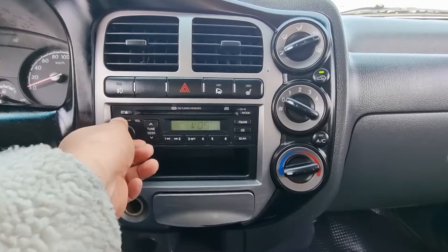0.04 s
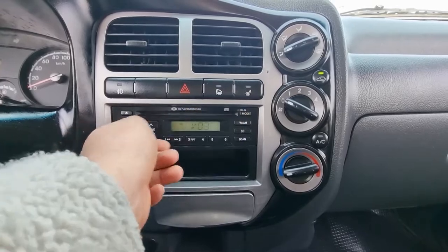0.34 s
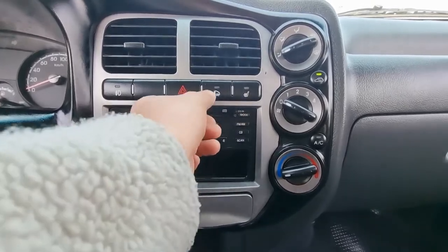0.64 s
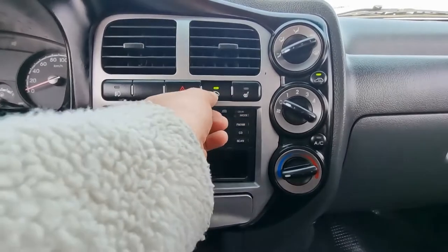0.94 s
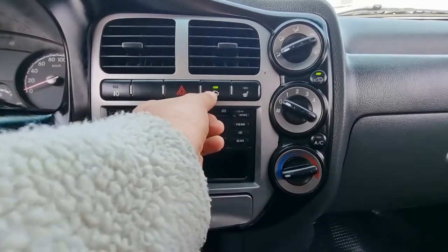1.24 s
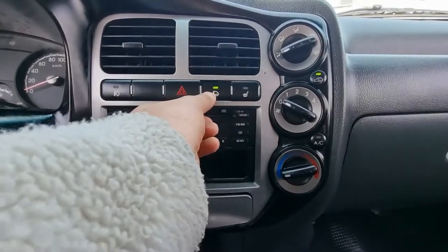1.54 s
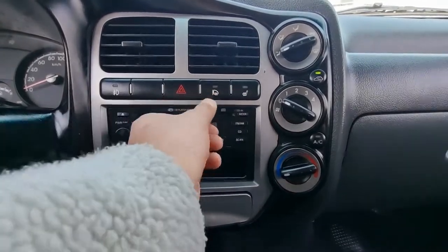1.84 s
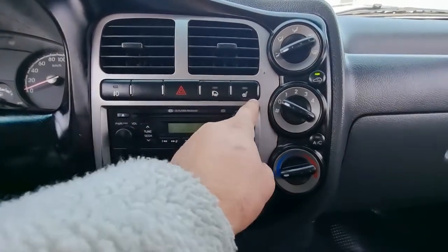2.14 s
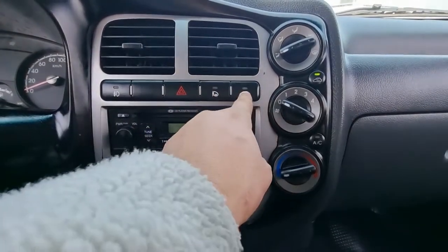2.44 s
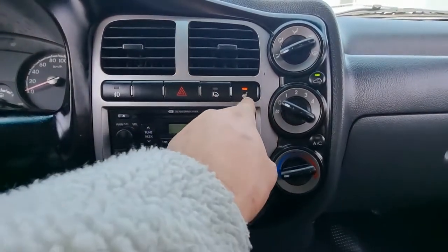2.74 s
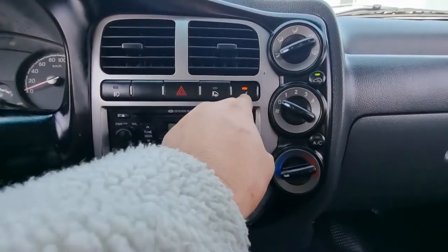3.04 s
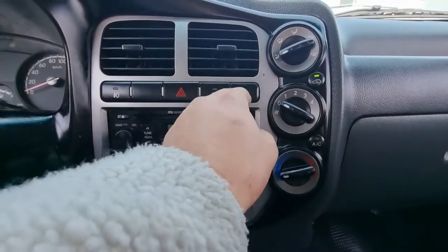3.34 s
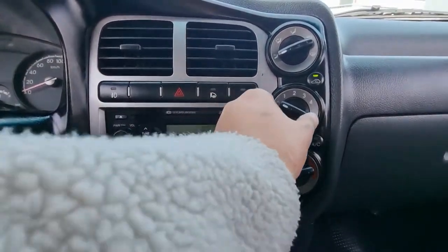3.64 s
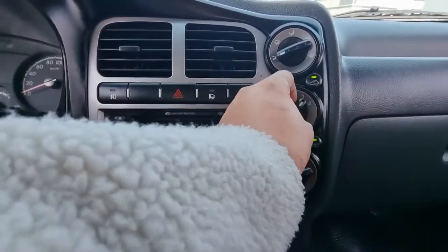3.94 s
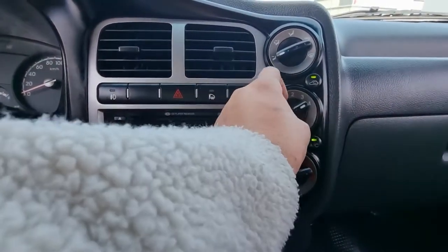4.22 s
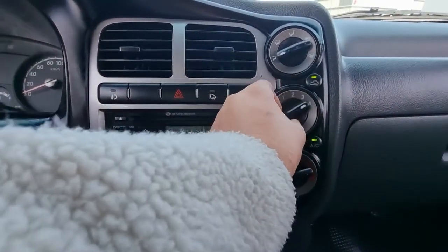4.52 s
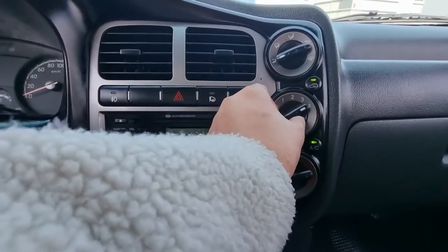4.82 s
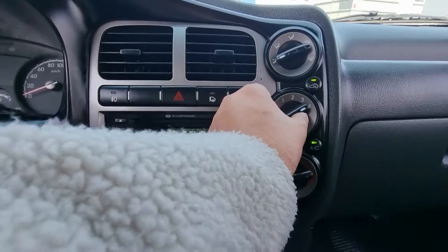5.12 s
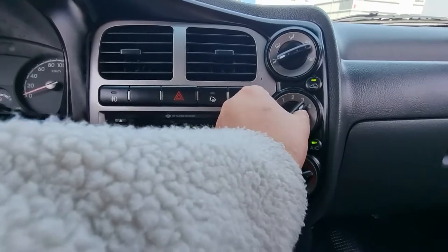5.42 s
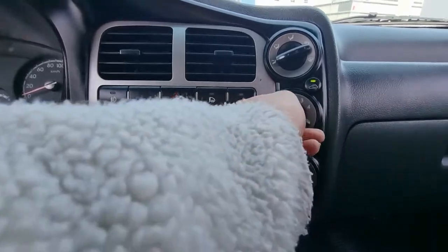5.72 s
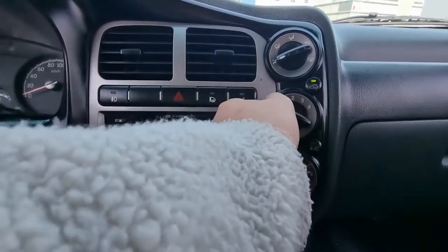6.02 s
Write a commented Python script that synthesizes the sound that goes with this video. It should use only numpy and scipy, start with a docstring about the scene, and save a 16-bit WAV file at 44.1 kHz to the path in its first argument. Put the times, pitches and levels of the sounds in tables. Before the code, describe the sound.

A diesel truck idles as dashboard buttons click, then a knob ratchets up, vent air rushes, and it is clicked off again.

```python
"""Buttons and fan in an idling truck

A small diesel booms and clatters through the cab. A hand in a fleece sleeve presses two dashboard
buttons on and off: caps squeak and knock the hollow panel, latches tick. The fan knob snaps up through
its detents, air rushes from the vents and buffets the microphone, and the engine hum thins for a while.
Then the knob is clicked back to off and the fan coasts down."""
import sys
import numpy as np
from scipy import signal
from scipy.fft import rfft, irfft, next_fast_len
from scipy.io import wavfile

SR = 44100
rng = np.random.default_rng(int(sys.argv[2]) if len(sys.argv) > 2 else 0)


def inscribe(sig):
    """Save sig as 16-bit PCM at rate SR to the path in sys.argv[1].

    A 1-D sig is mono; a 2-D sig holds one channel per row.
    Samples are clipped to [-1, 1] before scaling.
    """
    pcm = np.round(np.clip(np.atleast_2d(sig).T, -1, 1) * 32767)
    wavfile.write(sys.argv[1], SR, pcm.astype(np.int16))


N = 267687
TIME = np.arange(N) / SR
CAB_T60_S, CAB_BUILD_S, TRIM_CUT_HZ = 0.11, 0.003, 5500   # the cab's short, dull echoes
CAP_PAN_DB, TICK_PAN_DB, DETENT_PAN_DB, STOP_PAN_DB = -1, -4.5, -5, -1.5   # left minus right


def from_db(db):
    """Decibels to gain."""
    return 10 ** (np.asarray(db) / 20)


def unit_rms(x):
    """Scale to an rms of 1."""
    return x / np.sqrt(np.mean(x ** 2) + 1e-20)


def pan(left_db):
    """Channel gains for a left-minus-right level difference."""
    return from_db([[left_db / 2], [-left_db / 2]])


def curve_at(points, hz):
    """Read a curve of straight lines over log frequency."""
    knots, values = np.transpose(points)
    return np.interp(np.log(hz + 1), np.log(knots), values)


def butter(x, order, hz, kind):
    """Butterworth low-pass or high-pass."""
    return signal.sosfilt(signal.butter(order, hz, kind, fs=SR, output="sos"), x)


def drift(rate_hz):
    """Random wander of rms 1, mostly slower than rate_hz."""
    count = 2000
    hz = np.arange(count // 2 + 1) * SR / N
    slow = irfft(rfft(rng.standard_normal(count)) / (1 + (hz / rate_hz) ** 2))
    return np.interp(np.linspace(0, 1, N), np.linspace(0, 1, count), unit_rms(slow))


def swells(rows):
    """Gain over time: bell-shaped rises and falls that add in power."""
    return np.sqrt(sum(from_db(db) ** 2 * np.exp(-((TIME - s) / half_s) ** 2) for s, db, half_s in rows))


def push(start_s, end_s, growth_db, fade_s):
    """Gain over time: a rub changes by growth_db until the part gives, then dies away."""
    progress = np.clip((TIME - start_s) / (end_s - start_s), 0, 1)
    fade = np.exp(-np.maximum(TIME - end_s, 0) / fade_s)
    return (TIME > start_s) * from_db(growth_db * (progress - 1)) * fade


def stereo_noise(spectrum, likeness, resonances=()):
    """Coloured noise of rms 1 with resonant humps; likeness rows are freq_hz, left-right correlation."""
    size = next_fast_len(N, True)
    hz = np.arange(size // 2 + 1) * SR / size
    humps_db = sum(lift / (1 + (2 * (hz - centre) / width) ** 2) for centre, width, lift in resonances)
    alike = np.clip(curve_at(likeness, hz), -1, 1)
    mid, side = rfft(rng.standard_normal((2, size)))
    both = np.sqrt(1 + alike) * mid + np.sqrt(1 - alike) * side * [[1], [-1]]
    return unit_rms(irfft(both * from_db(curve_at(spectrum, hz) + humps_db), size)[:, :N])


def body(x, spectrum):
    """Ring through a minimum-phase filter of unit power gain."""
    size = x.shape[-1]
    gain = unit_rms(from_db(curve_at(spectrum, np.arange(size // 2 + 1) * SR / size)))
    cepstrum = irfft(np.log(gain))
    cepstrum[1:size // 2] *= 2
    cepstrum[size // 2 + 1:] = 0
    return irfft(rfft(x) * np.exp(rfft(cepstrum)))


def knocks(rows, spectrum, crack_db, chatter_t60_s, cab_db, rise_s):
    """Each blow is a crack, a brief chatter and the cab's duller echoes, all in the part's colour."""
    size = 8192
    age, out = np.arange(size) / SR, np.zeros((2, N + size))
    pole = np.exp(-2 * np.pi * TRIM_CUT_HZ / SR)   # seats and trim soak up the treble
    echo_gain = from_db(cab_db - 60 * age / CAB_T60_S) * (1 - np.exp(-age / CAB_BUILD_S))
    for s, db, left_db, tilt_db in rows:
        chatter, echoes = rng.standard_normal((2, 2, size))
        blow = chatter * from_db(-60 * age / chatter_t60_s) * (1 - np.exp(-age / rise_s))
        blow += signal.lfilter([1 - pole], [1, -pole], echoes) * echo_gain
        blow[:, 0] += from_db(crack_db)
        colour = [(hz, level + tilt_db * np.log2(hz)) for hz, level in spectrum]
        at = int(s * SR)
        out[:, at:at + size] += from_db(db) * pan(left_db) * body(blow, colour)
    return out[:, :N]


def rings(rows, modes, left_db, right_lag_s=0.000255):
    """Each blow sets a part's modes ringing; the sound reaches the right microphone a little later."""
    size = 8192
    out = np.zeros((2, N + size))
    age = np.maximum(np.arange(size) / SR - [[0], [right_lag_s]], 0)
    # neighbouring modes start in opposite directions, so the ring takes a moment to build
    ring = sum((-1) ** k * np.sin(2 * np.pi * hz * age) * from_db(db - 60 * age / t60)
               for k, (hz, db, t60) in enumerate(modes))
    for s, db in rows:
        at = int(s * SR)
        out[:, at:at + size] += from_db(db) * ring
    return out[:, :N] * pan(left_db)


def bass_dip(start_s=4.40, fall_s=0.061, end_s=5.78, recovery_s=0.35):
    """The bass dips while the fan blows: 0 is full bass, 1 the bottom of the dip."""
    return np.clip((TIME - start_s) / fall_s, 0, 1) * np.clip(1 - (TIME - end_s) / recovery_s, 0, 1)


FIRING_HZ, THINNING_DB = 28.86, 7.5   # idle rate; the bass dip's cut to thuds and extra cut to overtones
# Overtones of the engine's boom: multiple_of_firing_rate, level_db
ENGINE_ORDERS = [(2, -8), (3, -13), (4.25, -35.5), (5, -26.5), (6.15, -31.5), (10.25, -32.5), (10.5, -28),
                 (11, -35.5), (12.5, -35.5)]


def engine_hum(crank, dip, level_db=-24, dip_db=4, waver=0.048, flutter=0.35, boom_lag_s=0.0018):
    """The cab booms at the firing rate; low overtones are steady, high panel-borne ones flutter."""
    overtones = 0
    for order, db in ENGINE_ORDERS:
        unrest = waver if order < 4 or order == 5 else flutter
        phase = order * crank
        tone = (1 + unrest * drift(14)) * np.cos(phase) + unrest * drift(20) * np.sin(phase)
        # between its first two resonances the cab air moves against the drive
        sign = -1 if 2.5 < order < 4.5 else 1
        overtones += sign * from_db(db) * tone
    swell_db = 4 * np.exp(-((TIME - 4.27) / 0.16) ** 2)   # fuller as the fan spins up
    fullness = from_db(-0.5 + swell_db - THINNING_DB * dip)
    boom = np.cos(crank - 2 * np.pi * FIRING_HZ * boom_lag_s)
    return np.sqrt(2) * from_db(level_db - dip_db * dip) * (boom + fullness * overtones) * pan(0.89)


# Colour of the engine noise in the cab: freq_hz, level_db
COMBUSTION_SPECTRUM = [(15, -4.5), (60, 2.5), (110, -16), (165, -21.5), (310, -14), (480, -19.5),
                       (750, -22), (1000, -24.5), (1300, -21.5), (2000, -32), (3500, -40), (5800, -55.5),
                       (7300, -52), (8500, -69.5), (16000, -83.5)]
# Engine-bay whines and panel resonances: pitch_hz, width_hz, lift_db
ENGINE_WHINES = [(546, 10, 3.5), (824.5, 19, 13), (1354, 42, 9.5), (2430, 170, 3.5), (4440, 140, 4),
                 (5230, 100, 7.5), (6750, 250, 8)]


def combustion(crank, level_db=-40, clatter=0.098):
    """Combustion noise swells with every firing."""
    likeness = [(60, 0.61), (200, 1.0), (500, -0.51), (1200, -0.57), (5000, 0.095)]
    noise = stereo_noise(COMBUSTION_SPECTRUM, likeness, ENGINE_WHINES)
    bass = butter(noise, 2, 900, "low") * pan(0.4)
    treble = butter(noise, 2, 900, "high") * pan(-0.38)
    return from_db(level_db) * (bass - treble) * (1 + clatter * np.cos(crank))


# Colour of a thud through the bulkhead: freq_hz, level_db
THUD_SPECTRUM = [(40, -25.5), (90, 5.5), (140, -1), (220, -4), (320, -3.5), (450, -18), (1000, -38),
                 (4000, -67)]


def thuds(crank, dip, level_db=-45.5, decay_s=0.008):
    """Every firing sends one dull, quickly dying thud into the cab."""
    age = crank / (2 * np.pi) % 1 / FIRING_HZ
    pulse = unit_rms(np.exp(-age / decay_s) * (1 - np.exp(-age / CAB_BUILD_S)))
    rumble = stereo_noise(THUD_SPECTRUM, [(100, 0.93), (400, 0.54)])
    return from_db(level_db - THINNING_DB * dip) * pulse * rumble * pan(1.2)


def engine(hunting=0.0016, load_sag_hz=0.45):
    """Four cylinders idle; the fan's electrical load slows their firing a little."""
    dip = bass_dip()
    firing_hz = FIRING_HZ * (1 + hunting * drift(1.8)) - load_sag_hz * dip
    crank = np.pi / 2 + 2 * np.pi * np.cumsum(firing_hz) / SR   # one cycle per firing
    return engine_hum(crank, dip) + combustion(crank) + thuds(crank, dip)


# Colour of brushed fleece: freq_hz, level_db
FLEECE_SPECTRUM = [(200, -16.5), (1200, 12.5), (3000, 3), (6500, -6.5), (9000, -19.5), (16000, -32.5)]
# Reaches of the arm: peak_s, level_db, half_length_s, treble_db
ARM_REACHES = [(0.585, -53, 0.12, 0), (0.87, -54, 0.05, -1), (1.15, -56, 0.27, -8), (1.68, -58, 0.09, -5),
               (2.03, -60.5, 0.15, 0), (3.57, -56, 0.18, 0)]


def sleeve(hover_db=-79.5, grain_db=2.5):
    """Fleece brushes in fine catches, swelling with each reach of the arm; slow reaches are duller."""
    fleece = stereo_noise(FLEECE_SPECTRUM, [(200, 0.4), (4000, 0.075)])
    fleece *= unit_rms(from_db(grain_db * drift(90)))
    dull = signal.sosfiltfilt(signal.butter(3, 4000, fs=SR, output="sos"), fleece)
    motion = swells([(s, db, half_s) for s, db, half_s, _ in ARM_REACHES])
    brisk = swells([(s, db + treble_db, half_s) for s, db, half_s, treble_db in ARM_REACHES])
    return fleece * from_db(hover_db) + dull * motion + (fleece - dull) * brisk


# Fingertips sliding over a cap: start_s, end_s, end_level_db
FINGER_SLIDES = [(0.84, 0.893, -53), (0.908, 0.922, -52), (1.585, 1.63, -54), (2.54, 2.58, -59),
                 (3.32, 3.347, -57)]
# Colour of skin on plastic: freq_hz, level_db
SKIN_SPECTRUM = [(500, -6), (2500, 5), (6800, -2), (8500, -13), (11000, -16), (12500, -11), (16000, -20)]


def finger_scrapes(grain_db=3):
    """Skin catches finely on a cap, harder until the button gives."""
    force = sum(from_db(db) * push(start, end, growth_db=9, fade_s=0.014)
                for start, end, db in FINGER_SLIDES)
    skin = stereo_noise(SKIN_SPECTRUM, [(500, 0.3), (4000, 0.099)])
    grain = unit_rms(from_db(grain_db * drift(140)))
    return skin * force * grain * pan(TICK_PAN_DB)


# A cap sliding back out: start_s, level_db, pan_db, tilt_db_per_octave
CAP_ZIPS = [(1.656, -43, -4, 0)]
# Colour of the cap's guide: freq_hz, level_db
GUIDE_SPECTRUM = [(1000, -25), (4000, -9), (6000, 4), (6600, -3), (7600, -17), (10500, -14), (12300, -6),
                  (14200, -22)]


def cap_zip():
    """A released cap zips back along its guide."""
    return knocks(CAP_ZIPS, GUIDE_SPECTRUM, crack_db=-10, chatter_t60_s=0.085, cab_db=-12, rise_s=0.002)


# A stiff button rubbing in its guide: start_s, end_s, end_level_db, pitch_hz, growth_db
BUTTON_SQUEAKS = [(2.53, 2.584, -43.5, 3200, 9), (2.72, 2.756, -44, 3130, -5), (3.185, 3.22, -50, 3240, 8),
                  (3.315, 3.35, -39, 3180, 16)]


def squeaks(width_hz=85, rough_db=2.5):
    """Plastic sticks and slips as the cap moves; the irregular slips excite one narrow resonance."""
    out = 0
    radius = np.exp(-np.pi * width_hz / SR)
    for start, end, db, hz, growth_db in BUTTON_SQUEAKS:
        rub = push(start, end, growth_db, fade_s=0.007) * from_db(db + rough_db * drift(100))
        slips = rng.standard_normal((2, N)) * rub + 1e-18
        poles = [1, -2 * radius * np.cos(2 * np.pi * hz / SR), radius ** 2]
        out += np.sqrt((1 - radius ** 2) / 2) * signal.lfilter([1, 0, -1], poles, slips)
    return out


# Button caps seating: start_s, level_db, tilt_db_per_octave
BUTTON_STROKES = [(0.893, -26, -3), (1.630, -25.5, -2), (1.807, -21.5, 0), (2.582, -14.5, 5.5),
                  (2.723, -32.5, -5.5), (2.757, -23, 3), (3.217, -27, 2), (3.3495, -14.5, 2)]
# Colour of the hollow panel: freq_hz, level_db
PANEL_SPECTRUM = [(100, -22), (520, -18.5), (700, 0.5), (850, -2), (1000, -3), (1200, 2), (1400, -1),
                  (1650, -5.5), (1850, -8), (2030, -7.5), (2220, -14.5), (3000, -13), (3280, -16),
                  (3500, -21), (4800, -46.5), (8000, -53.5), (16000, -52)]
# Ring of the panel: pitch_hz, level_db, t60_s
PANEL_RING = [(855, -16, 0.028), (1205, -5, 0.026), (1400, -5, .022), (1620, -12, .016), (3050, -17, 0.02)]


def button_caps():
    """In each stroke the cap knocks the hollow panel and sets it ringing."""
    caps = [(s, db, CAP_PAN_DB, tilt_db) for s, db, tilt_db in BUTTON_STROKES]
    knock = knocks(caps, PANEL_SPECTRUM, crack_db=1, chatter_t60_s=0.016, cab_db=-9.5, rise_s=0.0007)
    return knock + rings([(s, db) for s, db, _ in BUTTON_STROKES], PANEL_RING, CAP_PAN_DB)


# Latches catching and letting go: start_s, level_db, tilt_db_per_octave
LATCH_TICKS = [(0.9038, -34.5, 6), (1.805, -42, -1), (2.578, -28.5, 3.5), (2.722, -38, -1),
               (2.7476, -27.5, 7.5), (3.208, -33, 10.5), (3.344, -27, 2.5)]
# Fingernails touching the controls: start_s, level_db, tilt_db_per_octave
NAIL_TICKS = [(1.055, -50, -4), (2.452, -35, -9), (2.694, -42, -5.5), (3.129, -42, -6), (3.327, -44, 10),
              (3.846, -38, -1.5), (4.239, -22, 2), (6.046, -28.5, 0.5)]
# Colour of both kinds of tick: freq_hz, level_db
TICK_SPECTRUM = [(300, -12.5), (1500, -7.5), (3000, 1.5), (6200, -2.5), (7400, -5), (8400, -14.5),
                 (10500, -12.5), (11800, -13.5), (13000, -4.5), (14300, -13), (16000, -17.5)]


def latches_and_nails():
    """Button latches and fingernails strike plastic in light, bright ticks."""
    ticks = [(s, db, TICK_PAN_DB, tilt_db) for s, db, tilt_db in LATCH_TICKS + NAIL_TICKS]
    return knocks(ticks, TICK_SPECTRUM, crack_db=-2, chatter_t60_s=0.011, cab_db=-6.5, rise_s=0.0005)


# Fan knob notches, three up and three down: start_s, level_db, crest_lead_s, tilt_db_per_octave, ring_db
KNOB_DETENTS = [(3.868, -15.5, 0.0033, -0.5, -10), (3.911, -14.5, 0.0024, -.5, -1),
                (3.954, -14, 0.0029, 0.5, -12), (5.486, -16, 0.00052, -0.5, 1.5),
                (5.553, -18, 0.0045, -1.5, -6), (5.627, -18, 0.0059, 1, -11)]
# Colour of the spring's snap: freq_hz, level_db
SNAP_SPECTRUM = [(300, -9), (1200, -12), (2200, -6), (3200, 0.5), (4000, 1), (4700, -0.5), (7000, 5),
                 (8500, -2), (10300, -3), (11800, -4.5), (12900, -6), (14000, -7), (16000, -5)]
# Ring of the detent spring: pitch_hz, level_db, t60_s
SPRING_RING = [(3970, -29, 0.036), (4090, -31, 0.026), (12900, -24, 0.018), (13350, -26, 0.012)]
# The knob hits its two end stops, then settles back: start_s, level_db, tilt_db_per_octave, ring_db
KNOB_STOPS = [(4.019, -16.5, 1, -20), (5.691, -18, -0.5, -11.5), (5.736, -29.5, 0, -42)]
# Colour of an end-stop knock: freq_hz, level_db
STOP_SPECTRUM = [(100, -23), (450, -1.5), (660, 7), (850, -3.5), (950, -1.5), (1250, 4), (1700, 0),
                 (2000, 1.5), (2400, -1.5), (4200, -3.5), (7000, -8.5), (10000, -18.5), (16000, -30)]
# Ring of the knob's housing: pitch_hz, level_db, t60_s
HOUSING_RING = [(688, -6, 0.028), (836, -20, 0.04)]


def fan_knob(crest_db=-6, crest_tilt_db=-1.7, stop_crest_db=-3, stop_crest_tilt_db=-2, stop_lead_s=0.0067):
    """A spring ticks over each crest and snaps into the notch; at the end stops a duller knock follows."""
    crests = [(s - lead_s, db + crest_db, DETENT_PAN_DB, crest_tilt_db)
              for s, db, lead_s, *_ in KNOB_DETENTS]
    drops = [(s, db, DETENT_PAN_DB, tilt_db) for s, db, _, tilt_db, _ in KNOB_DETENTS]
    stop_crests = [(s - stop_lead_s, db + stop_crest_db, DETENT_PAN_DB, stop_crest_tilt_db)
                   for s, db, *_ in KNOB_STOPS[:2]]
    stops = [(s, db, STOP_PAN_DB, tilt_db) for s, db, tilt_db, _ in KNOB_STOPS]
    snaps = knocks(crests + drops + stop_crests, SNAP_SPECTRUM,
                   crack_db=0, chatter_t60_s=0.0095, cab_db=-7.5, rise_s=0.0005)
    clunks = knocks(stops, STOP_SPECTRUM, crack_db=2, chatter_t60_s=0.035, cab_db=-5, rise_s=0.0017)
    spring = rings([(s, ring_db) for s, *_, ring_db in KNOB_DETENTS], SPRING_RING, DETENT_PAN_DB)
    housing = rings([(s, ring_db) for s, *_, ring_db in KNOB_STOPS], HOUSING_RING, CAP_PAN_DB)
    return snaps + clunks + spring + housing


def airflow_db(on_s=4.074, spin_up_s=0.094, off_s=5.558, coast_db_per_s=61, db_per_decade=64):
    """The fan spins up to full speed (0 dB) and coasts down; air noise follows a power of its speed."""
    speed = 1 - np.exp(-np.maximum(TIME - on_s, 1 / SR) / spin_up_s)
    return db_per_decade * np.log10(speed) - coast_db_per_s * np.maximum(TIME - off_s, 0)


# Colour of wind on the microphone: freq_hz, level_db
BUFFET_SPECTRUM = [(15, -6.5), (40, 3.5), (90, -3), (160, -7), (290, -4), (400, -21.5), (700, -22),
                   (1200, -24), (4000, -93)]
# Stray gusts: peak_s, level_db, half_length_s
STRAY_GUSTS = [(4.045, -28.5, 0.022), (4.14, -33.5, 0.07), (4.27, -31.5, 0.045), (4.36, -30.5, 0.04),
               (5.22, -36.5, 0.13), (6.05, -40.5, 0.17)]
# A pop of air on the microphone: start_s, level_db, pan_db, tilt_db_per_octave
AIR_POPS = [(4.393, -18.5, 21, 0)]
# Colour of the pop: freq_hz, level_db
POP_SPECTRUM = [(30, 1), (250, -2), (400, -10), (750, -9), (1100, -30), (4000, -74)]


def draught(level_db=-29, dip_db=15.5, lumps_db=3.5):
    """The air stream hits the microphone ports in lumps, once with a pop."""
    stream = from_db(level_db + airflow_db() - dip_db * bass_dip())
    wind = stereo_noise(BUFFET_SPECTRUM, [(40, 0.79), (300, 0.64)])
    strength = np.hypot(stream, swells(STRAY_GUSTS)) * from_db(lumps_db * drift(28))
    pop = knocks(AIR_POPS, POP_SPECTRUM, crack_db=6, chatter_t60_s=0.065, cab_db=-37, rise_s=0.004)
    return wind * strength * pan(2.2) + pop


# Air duct resonances, level against the rush: pitch_hz, width_hz, level_db
DUCT_RESONANCES = [(572, 35, -13.5), (732, 29, -11), (825, 36, -15.5), (1206, 61, -12), (1974, 80, -13.5),
                   (2570, 77, -23), (3070, 120, -20.5)]


def duct_tones(wander=0.011, flicker_db=2.5):
    """Turbulence sets the duct resonances ringing; each wanders in pitch and strength on its own."""
    out = 0
    for hz, width_hz, db in DUCT_RESONANCES:
        phase = 2 * np.pi * np.cumsum(hz * (1 + wander * drift(4))) / SR
        cos, sin = np.cos(phase), np.sin(phase)
        ringing = np.array([drift(width_hz) * cos + drift(width_hz) * sin for side in range(2)])
        out += from_db(db) * unit_rms(ringing * from_db(flicker_db * drift(3.2)))
    return out


# Colour of the rush from the vents: freq_hz, level_db
VENT_SPECTRUM = [(60, -14), (150, -14), (215, -1.5), (290, -3), (350, -14), (750, -9), (1250, -6.5),
                 (1650, -15.5), (2200, -14.5), (4500, -22.5), (7000, -26.5), (10500, -41.5), (12800, -39),
                 (16000, -44)]


def blower(level_db=-33.5, flutter_db=0.5):
    """Air rushes through the ducts and out of the vents; its hiss comes more from the right."""
    likeness = [(200, 0.98), (600, -0.038), (1200, -0.73), (2500, -0.13), (8000, -0.036)]
    air = stereo_noise(VENT_SPECTRUM, likeness) + duct_tones()
    hiss = butter(air, 1, 2500, "high")
    rush = (air - hiss) * pan(1.6) + hiss * pan(-4.5)
    return rush * from_db(level_db + airflow_db() + flutter_db * drift(21))


def scene():
    """Everything heard in the cab."""
    machinery = engine() + blower() + draught()
    buttons = button_caps() + latches_and_nails() + finger_scrapes() + cap_zip() + squeaks()
    return machinery + buttons + fan_knob() + sleeve()


def record(dry):
    """A steep low-pass takes off the very top."""
    cutoff_hz, run_in = 15700, 2000   # the run-in samples let the filter settle
    padded = np.pad(dry, ((0, 0), (run_in, 0)), "reflect", reflect_type="odd")
    lowpass = signal.ellip(10, 0.2, 90, cutoff_hz, fs=SR, output="sos")
    return signal.sosfilt(lowpass, padded)[:, run_in:]


dry = scene()
out = record(dry)
inscribe(out)
```